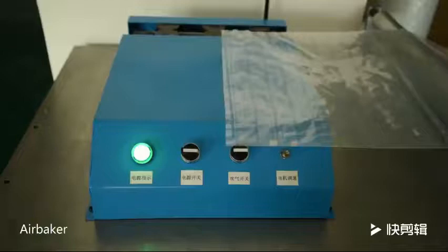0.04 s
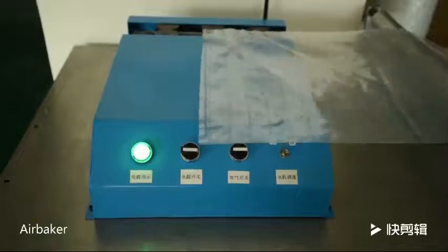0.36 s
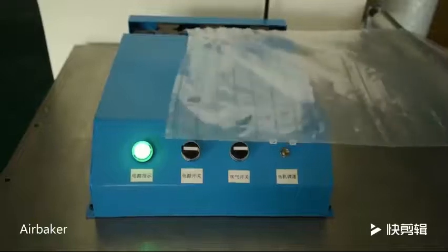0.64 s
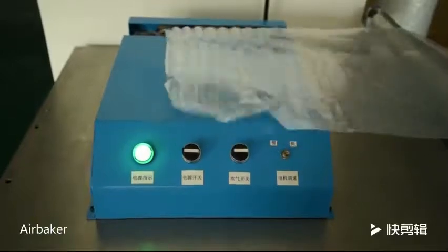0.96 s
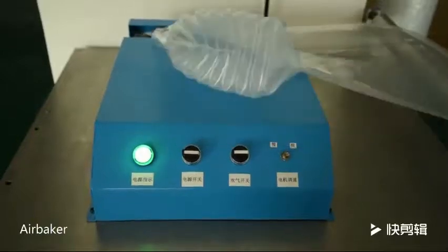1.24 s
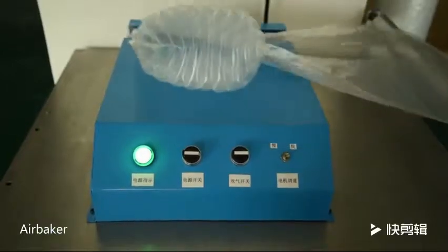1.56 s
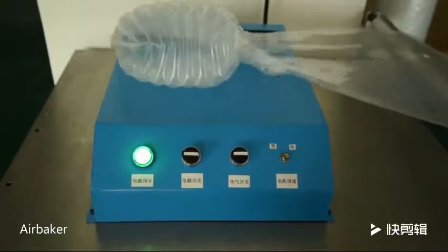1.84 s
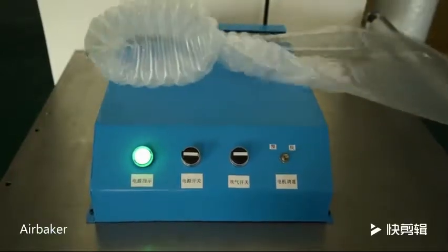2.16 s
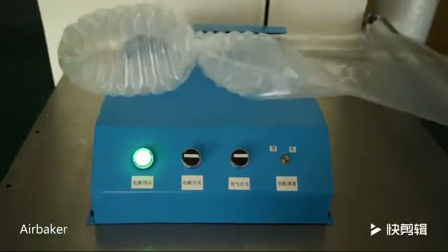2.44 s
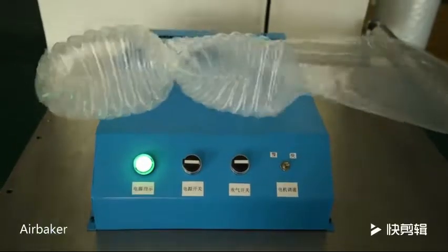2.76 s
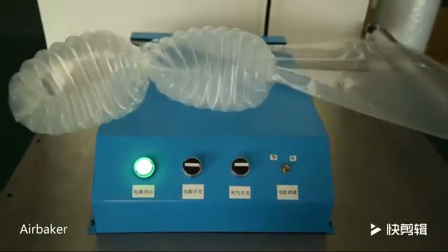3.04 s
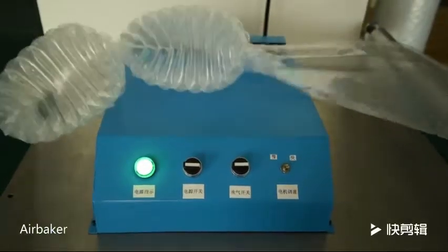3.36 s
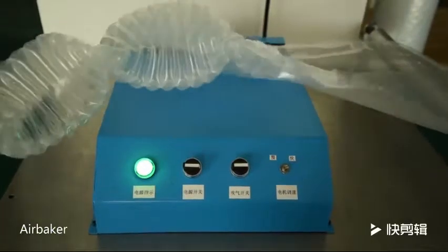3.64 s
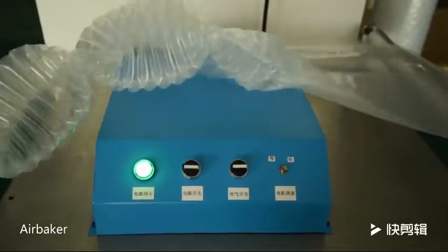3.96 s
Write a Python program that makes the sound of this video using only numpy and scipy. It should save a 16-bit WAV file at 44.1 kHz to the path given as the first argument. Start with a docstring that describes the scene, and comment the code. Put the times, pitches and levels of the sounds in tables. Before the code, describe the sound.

Air hisses and squeals as a machine inflates plastic film, over a low hum.

```python
"""Air hisses from the nozzle of an air-cushion machine and rushes into plastic film feeding over it.
It whistles through the narrow necks of the chambers in rough, gliding squeals, while the swelling
film crinkles and pops into shape with dull thumps. Underneath, the blower hums and rumbles.
The machine stands on a steel bench in a small workshop; the sound cuts in abruptly."""
import sys
import numpy as np
from scipy import signal
from scipy.io import wavfile

SR = 44100
rng = np.random.default_rng(int(sys.argv[2]) if len(sys.argv) > 2 else 0)


def unload_audio(sound):
    """Save the sound as a 16-bit wav file, at the path given as the first command line argument."""
    columns = np.transpose(np.atleast_2d(sound))
    # keep every value between -1 and 1, then stretch to whole-number steps
    steps = np.round(np.clip(columns, -1, 1) * 32767)
    wavfile.write(sys.argv[1], SR, steps.astype(np.int16))


N = 176400
TIME = np.arange(N) / SR
FILM_FROM_S = .65   # the film reaches the nozzle

# Colour of the hiss from the bare nozzle: f/Hz, relative level/dB
BARE_JET_SPECTRUM = [(710, -54), (1200, -25), (1410, -21), (2010, -29), (2210, -22), (2650, -17),
                     (3210, -20), (3610, -12.5), (4880, -14), (5260, -14), (5850, -3), (6370, -7),
                     (7570, -2), (8510, 0.5), (10400, -6.5), (11400, -7), (11900, -13.5), (13900, -12),
                     (15500, -22)]
# Stereo image of the bare hiss: f/Hz, left-right likeness (clipped to 0-1)
BARE_JET_LIKENESS = [(1200, .6), (2400, 0), (3500, 2.5), (4400, -1.5), (5900, .75), (6800, 0.2), (7600, 1),
                     (10500, .75), (12500, 0.2), (15000, .1)]
# Lean of the bare hiss: f/Hz, left minus right/dB
BARE_JET_BALANCE = [(60, 0.0), (130, 0.0), (290, 0.0), (640, -0.5), (1410, -1.5), (3100, -0.3),
                    (6820, -1.4), (15000, -0.33)]
# Colour of the hiss under the film: f/Hz, relative level/dB
COVERED_JET_SPECTRUM = [(1000, -27), (2000, -14.5), (2500, -14), (3300, -14.5), (5200, -14.5), (6100, -7),
                        (6800, -1.5), (7700, 0.5), (9400, 0), (11000, -6.5), (12200, -9), (14000, -11),
                        (15500, -21.5)]
# Fader ride of the hiss: t/s, level/dB
JET_FADER = [(0.1, -24), (0.44, -24), (0.8, -21.5), (0.86, -20), (0.87, -18.5), (0.88, -22.5),
             (1.85, -28.5), (1.88, -26.5), (2.4, -25.5), (2.42, -23.5), (2.43, -23.5), (2.92, -25),
             (3.28, -27.5), (3.31, -33), (3.37, -27), (3.38, -26), (3.43, -24.5), (3.96, -27)]
# Colour of the air rushing into the chambers: f/Hz, relative level/dB
RUSH_SPECTRUM = [(500, -14), (1100, -19.5), (1700, -6.5), (2500, -5.5), (3400, 0), (4500, 2), (5600, 2.5),
                 (6800, -0.5), (8000, 0), (12000, -23)]
# Fader ride of the rush: t/s, relative level/dB
RUSH_FADER = [(0.5, -33), (0.66, -35), (0.7, -29), (1.79, -32), (1.8, -42), (1.86, -28), (1.93, -38.5),
              (1.99, -27), (2.02, -33), (2.22, -28.5), (2.27, -34.5), (2.46, -34.5), (2.48, -30),
              (2.64, -31), (2.7, -28), (3.09, -32), (3.67, -30.5), (3.96, -31)]
# Lead squeals of air through the film: t/s, length/s, first f/Hz, last f/Hz, relative level/dB
SQUEAL_CUES = [ (0.382, .028, 4940, 6170, -26), (0.649, 0.085, 2713, 2490, -31.5),
               (0.7, .08, 3100, 2755, -36), (0.745, 0.087, 2490, 2340, -37),
               (0.838, 0.031, 8000, 8200, -25), (0.861, 0.018, 8450, 8480, -21),
               (0.873, 0.046, 2704, 2460, -31), (0.92, 0.066, 3300, 3200, -34),
               (0.93, 0.058, 9700, 9060, -28), (0.937, 0.068, 6800, 6300, -27),
               (1.02, .12, 4050, 4250, -32), (1.07, .12, 3600, 3150, -33), (1.2, .1, 3420, 3566, -29.5),
               (1.292, 0.024, 10600, 9490, -31.5), (1.304, 0.033, 3450, 3240, -27),
               (1.336, 0.059, 3220, 3190, -25.5), (1.305, .045, 12200, 12500, -40),
               (1.312, 0.089, 6650, 6360, -32.5), (1.38, .025, 5050, 4750, -28.5),
               (1.39, .025, 3510, 3740, -29), (1.405, 0.049, 4360, 4050, -28),
               (1.449, .04, 3600, 3550, -31), (1.545, 0.044, 8860, 8100, -33),
               (1.549, .06, 7100, 6920, -35), (1.658, .09, 3300, 3055, -30.5),
               (1.753, 0.072, 4100, 4290, -39), (1.818, 0.062, 5260, 4790, -34),
               (1.869, 0.12, 4610, 3950, -26), (1.875, 0.11, 8900, 8100, -30),
               (2.032, 0.021, 9350, 7790, -25), (2.091, .12, 4080, 3970, -31.5),
               (2.161, 0.068, 3480, 3160, -35), (2.21, 0.14, 5900, 6900, -32),
               (2.351, 0.17, 6750, 6950, -33), (2.382, 0.13, 3210, 3520, -31.5),
               (2.409, 0.021, 9100, 9500, -27), (2.515, 0.056, 3686, 3950, -25),
               (2.549, 0.023, 9000, 9580, -28.5), (2.61, .11, 3850, 3600, -28),
               (2.73, .11, 3700, 3600, -30), (2.729, .06, 4150, 4050, -32),
               (2.848, 0.1263, 3600, 3765, -28.5), (2.943, .024, 12980, 13900, -33),
               (2.963, 0.022, 10100, 11160, -29), (2.96, .05, 4050, 4100, -33),
               (2.994, 0.076, 3720, 3520, -30.5), (3.005, 0.18, 7390, 6230, -30),
               (3.122, 0.066, 3980, 3780, -32.5), (3.16, .11, 3150, 2888, -39),
               (3.208, 0.029, 8350, 9200, -33.5), (3.254, .028, 6300, 7470, -28),
               (3.371, 0.025, 10700, 11200, -28), (3.385, 0.08, 3986, 4450, -29.5),
               (3.47, 0.055, 4400, 4050, -36), (3.542, 0.089, 4286, 3980, -31),
               (3.598, 0.17, 6900, 6100, -31.5), (3.64, 0.18, 3486, 2938, -31.5),
               (3.645, 0.095, 2700, 2600, -33.5), (3.839, .07, 4430, 3770, -27),
               (3.845, .035, 8810, 8260, -32), (3.897, .11, 7400, 7420, -32.5)]
# Broad resonance of the neck being filled: t/s, f/Hz, relative level/dB
NECK_PATH = [(0.58, 2590, -39.5), (0.76, 2553, -30), (0.9, 2700, -38.5), (1.08, 3900, -27),
             (1.3, 3600, -28), (1.459, 3905, -28), (1.65, 3400, -35.5), (1.8, 4300, -35.5),
             (1.92, 4293, -29), (2.05, 3920, -32), (2.16, 3785, -34), (2.32, 3506, -33), (2.6, 3902, -30),
             (2.92, 3747, -31.5), (3.3, 3218, -38), (3.45, 4220, -33), (3.7, 3200, -32), (4.0, 3800, -35)]
# Chambers popping into shape, each with its ring: t/s, level/dB, f/Hz
POP_CUES = [(0.865, -32, 110), (0.873, -31, 300), (0.979, -35, 190), (1.081, -36, 130), (1.382, -33, 140),
            (2.021, -28, 140), (2.562, -30, 260.7), (2.585, -30, 200), (2.633, -29, 100),
            (2.696, -30, 198.8), (2.706, -20, 236), (2.755, -31, 190), (2.938, -28, 420), (2.949, -31, 110)]
# Colour of the puff of air in a pop: f/Hz, relative level/dB
PUFF_SPECTRUM = [(30, -15), (80, 5), (250, -3.5), (450, -1.5), (900, -2.5), (2000, -12.5), (5000, -28)]
# Colour of the crinkling film: f/Hz, relative level/dB
CRINKLE_SPECTRUM = [(400, -14), (1500, 2), (4000, 0.5), (9000, -4.5), (15000, -6)]
# Hum of the blower and drive: f/Hz, level/dB, width/Hz, steady share (0-1)
BLOWER_TONES = [(188.6, -44, 14.8, 0.31), (343, -46, 8.7, 0.48), (251.2, -56.5, 23, 0.07),
                (793, -56, 5, 0.64), (832, -59, 6.4, 0.7), (856, -49.5, 3.9, 0.93), (1714, -49.5, 50, 0)]
# Colour of the blower's rumble: f/Hz, relative level/dB
RUMBLE_SPECTRUM = [(20, -26), (32, -19), (55, -2.5), (90, -1.5), (160, -0.5), (280, -2.5), (400, -3),
                   (560, -9), (750, -5.5), (950, -10), (1400, -9), (2000, -10), (2800, -29)]
# Brief, wide swells of bass: t/s, length/s, level/dB
BASS_SWELLS = [(2.095, .09, -52), (2.35, 0.064, -50), (2.563, 0.043, -43), (2.76, .05, -51.5),
               (2.975, 0.088, -48), (3.134, 0.14, -43), (3.25, 0.14, -48)]
# Default stereo image of the noise layers: f/Hz, left-right likeness (0-1)
NOISE_LIKENESS = [(40, 1), (350, 1), (600, .9), (1100, .62), (2000, .55), (3200, .85), (4500, .5),
                  (6500, .42), (8500, .42), (12500, .08)]
# Default lean of the noise layers: f/Hz, left minus right/dB
NOISE_BALANCE = [(250, -1.5), (1100, -1), (2200, -3), (5000, -0.5), (8500, -3), (10500, -10), (12500, 1)]


def airflow():
    """The bare jet hisses evenly; once film covers it, hiss and rush scatter and tremble together."""
    (jet_db,), (rush_db,) = in_time(JET_FADER), in_time(RUSH_FADER)
    covered = np.interp(TIME, [.6, 1], [0, 1])   # the film slides over the nozzle
    filling = np.clip(TIME / FILM_FROM_S, 0, 1) ** 8
    tremble_db = filling * (.98 * drift(25) + .5 * drift(130))
    bare = from_db(.5) * air_noise(BARE_JET_SPECTRUM, flicker_db=1.1, flicker_per_s=28,
                                   likeness=BARE_JET_LIKENESS, balance=BARE_JET_BALANCE)
    under_film = air_noise(COVERED_JET_SPECTRUM, flicker_db=2.08, flicker_per_s=23)
    jet = from_db(jet_db) * (np.sqrt(1 - covered) * bare + np.sqrt(covered) * under_film)
    rush = from_db(rush_db + 3.5) * air_noise(RUSH_SPECTRUM, flicker_db=2.95, flicker_per_s=20.4)
    return (jet + filling * rush) * from_db(tremble_db)


def whistle(length, first_hz, last_hz, db, attack_s=.0098, release_s=.012, wobble_hz=58, flutter_db=2.2):
    """One breathy whistle: the gap in the film flutters while its pitch glides."""
    t = TIME[:int(length * SR)]
    hz = np.geomspace(first_hz, last_hz, len(t)) + wobble_hz * drift(40, len(t))
    envelope = np.clip(np.minimum(t / attack_s, (length - t) / release_s), 0, 1)
    tone = resonance(hz, width_hz=270, pure_share=.64)
    flutter = from_db(flutter_db * drift(72, len(t)))
    return from_db(db) * rms_one(tone * flutter * envelope)


def squeals(stray_count=45, squeak_count=110, glide_range=.1635):
    """Air squeezes through the film: lead squeals, strays near the neck's pitch, faint high squeaks."""
    track, film_s = np.zeros(N), N / SR - FILM_FROM_S
    neck_s, neck_hz, neck_db = np.transpose(NECK_PATH)
    squeaks, strays = rng.random((squeak_count, 4)), rng.random((stray_count, 4))
    for s, length, first_hz, last_hz, db in SQUEAL_CUES:
        add(track, s, whistle(length, first_hz, last_hz, db + 2))
    for when, span, pitch, glide in strays:
        s = FILM_FROM_S + when * film_s
        hz = np.interp(s, neck_s, neck_hz) * (.8 + .4 * pitch)
        last_hz = hz * (1 + glide_range * (glide - .5))
        db = np.interp(s, neck_s, neck_db) - 1.5
        add(track, s, whistle(.0519 * (.5 + span), hz, last_hz, db))
    for when, span, pitch, glide in squeaks:
        hz = 5905 * (11480 / 5905) ** pitch   # anywhere from 5905 to 11480 Hz
        last_hz = hz * (1 + glide_range * (glide - .5))
        add(track, FILM_FROM_S + when * film_s, whistle(.032 * (.5 + span), hz, last_hz, db=-35.5))
    return in_room(track, wet_db=-5)


def neck():
    """Air rings broadly in the neck of a chamber, its pitch moving as the film passes."""
    hz, db = in_time(NECK_PATH)
    ring = bandpass(resonance(hz, width_hz=1200), 2000, 6500)
    flicker_db = 1.6 * drift(22)
    return in_room(ring * from_db(db - 2 + flicker_db), wet_db=-1)


def film_pops(snap_hz=750, snap_decay_s=.0007, ring_peak_s=.0029):
    """A chamber pops into shape: a papery snap, a short dull ring and a puff of air."""
    knocks, puff_hits, t = np.zeros(N), np.zeros(N), TIME[:SR // 10]
    snap = from_db(-21) * np.sin(2 * np.pi * snap_hz * t) * np.exp(-t / snap_decay_s)
    ring_envelope = t / ring_peak_s * np.exp(1 - t / ring_peak_s)
    for s, db, hz in POP_CUES:
        strength = from_db(.3 * (db + 32))   # snap and puff vary less than the ring
        ring = from_db(db) * np.sin(2 * np.pi * hz * t) * ring_envelope
        add(knocks, s, strength * snap + ring)
        add(puff_hits, s, strength * from_db([-32]))
    air = air_noise(PUFF_SPECTRUM, flicker_db=2.5, flicker_per_s=6.8)
    return knocks + bursts(puff_hits, decay_s=.0092) * air


def film_crinkle(creases_per_s=60):
    """The swelling film creases at random, each crease a tiny tick of noise."""
    creases = (rng.random(N) < creases_per_s / SR) * (TIME > FILM_FROM_S)
    accents = from_db(2.8 * np.minimum(rng.exponential(1, N), 2))
    envelope = rms_one(bursts(creases * accents, decay_s=.003))
    return from_db(-43) * envelope * air_noise(CRINKLE_SPECTRUM, flicker_db=5.5, flicker_per_s=24)


def blower():
    """Wavering motor tones over a bed of rumble."""
    hum = sum(from_db(db) * resonance(np.full(N, hz), width, steady)
              for hz, db, width, steady in BLOWER_TONES)
    return hum + from_db(-38) * air_noise(RUMBLE_SPECTRUM, flicker_db=1.5, flicker_per_s=10)


def wide_bass():
    """Short swells of low noise, opposite in polarity at the two ears."""
    swell = np.zeros(N)
    for s, length, db in BASS_SWELLS:
        add(swell, s, from_db(db) * np.sin(np.linspace(0, np.pi, int(length * SR))))
    bass = bandpass(rng.standard_normal(N), 70, 220, order=3)
    return swell * rms_one(bass) * [[1], [-1]]


def in_room(x, wet_db, t60_s=.17):
    """The workshop adds dense, quickly dying reflections, different on each side."""
    t = TIME[:SR // 3]
    tail = rng.standard_normal((2, len(t))) * from_db(-60 * t / t60_s)
    tail /= np.sqrt(np.sum(tail ** 2, axis=1, keepdims=True))
    reflections = signal.fftconvolve(x[None], tail, axes=1)[:, :N]
    return pan(-.4) * (x + from_db(wet_db) * reflections)


def resonance(hz, width_hz, pure_share=0):
    """Turbulence rings around a pitch; a share of its power locks into a pure tone."""
    phase = 2 * np.pi * np.cumsum(hz) / SR
    breath = drift(width_hz / 2, len(hz)) * np.cos(phase) + drift(width_hz / 2, len(hz)) * np.sin(phase)
    return np.sqrt(1 - pure_share) * breath + np.sqrt(2 * pure_share) * np.sin(phase)


def air_noise(spectrum, flicker_db, flicker_per_s, likeness=NOISE_LIKENESS, balance=NOISE_BALANCE):
    """Stereo noise in bands, each with its own level, flicker, width and pan; unit rms in the middle."""
    edges = np.r_[np.geomspace(22, 2000, 13)[:-1], np.geomspace(2000, 5000, 6)[:-1],
                  np.geomspace(5000, 16500, 17)]
    white, mix = rng.standard_normal((2, 2, N)), 0
    for k, (low, high) in enumerate(zip(edges, edges[1:])):
        if high < spectrum[0][0] or low > spectrum[-1][0]:
            continue
        hz = np.sqrt(low * high)
        mid, side = bandpass(white[k % 2], low, high)
        alike = np.clip(at_hz(likeness, hz), 0, 1)
        width = np.sqrt((1 - alike) / (1 + alike))
        gain = from_db(at_hz(spectrum, hz) + flicker_db * drift(flicker_per_s))
        mix = mix + gain * pan(at_hz(balance, hz)) * (mid + width * side * [[1], [-1]])
    return mix / np.sqrt(np.mean(mix.mean(0) ** 2))


def drift(per_s, size=N):
    """Smooth random modulation of unit rms, changing about per_s times a second."""
    pole = np.exp(-16 * np.pi * per_s / SR)   # runs at an eighth of the sample rate
    white = rng.standard_normal(size // 8 + 4002)
    slow = signal.lfilter([1], [1, -2 * pole, pole * pole], white)[4000:]
    return np.interp(np.arange(size) / 8, np.arange(len(slow)), rms_one(slow))


def bursts(hits, decay_s):
    """An envelope that jumps at each hit and dies away."""
    return signal.lfilter([1], [1, -np.exp(-1 / (decay_s * SR))], hits + 1e-18)


def bandpass(x, low_hz, high_hz, order=2):
    """Roll off the lows and highs around a band."""
    return signal.sosfilt(signal.butter(order, [low_hz, high_hz], "band", fs=SR, output="sos"), x)


def from_db(db):
    """Decibels to gain."""
    return 10 ** (np.asarray(db) / 20)


def rms_one(x):
    """Scale to unit rms."""
    return x / np.sqrt(np.mean(x ** 2) + 1e-20)


def in_time(rows):
    """Each column of an automation curve at every sample."""
    s, *columns = np.transpose(rows)
    return [np.interp(TIME, s, column) for column in columns]


def at_hz(points, hz):
    """Read a curve on a log-frequency axis."""
    f, value = np.transpose(points)
    return np.interp(np.log(hz), np.log(f), value)


def pan(db):
    """Left and right gains for a level difference."""
    return from_db(np.array([[db], [-db]]) / 2)


def add(track, s, sound):
    """Mix a sound in at s seconds."""
    i = int(np.clip(s * SR, 0, N - 1))
    track[i:i + len(sound)] += sound[:N - i]


def scene():
    """Lay down the low bed, then the air and the film on top."""
    return blower() + wide_bass() + airflow() + neck() + squeals() + film_pops() + film_crinkle()


def record(dry, start_s=.072, ceiling=.8, cutoff_hz=15700):
    """Round off the highest peaks, cut in hard and trim the very top."""
    rounded = dry / (1 + (dry / ceiling) ** 4) ** .25
    lowpass = signal.ellip(10, .1, 80, cutoff_hz, fs=SR, output="sos")
    return signal.sosfilt(lowpass, rounded * (TIME >= start_s))


dry = scene()
out = record(dry)
unload_audio(out)
```